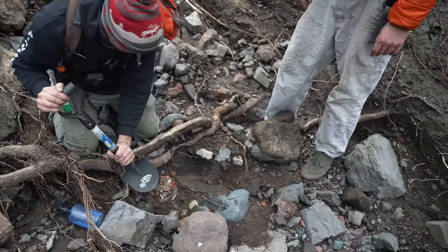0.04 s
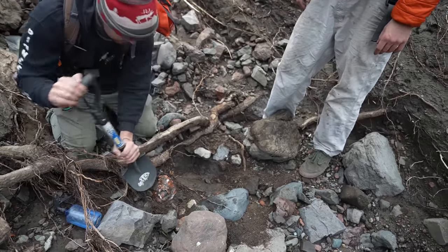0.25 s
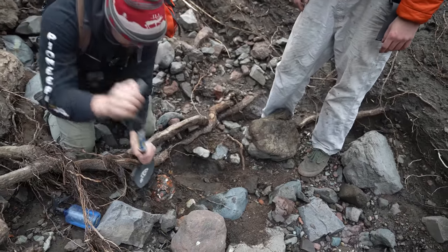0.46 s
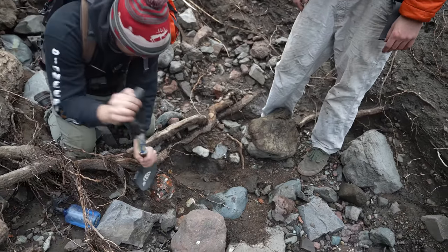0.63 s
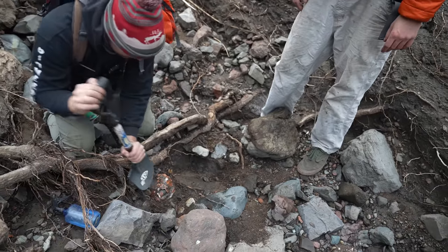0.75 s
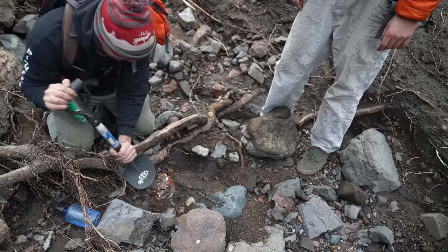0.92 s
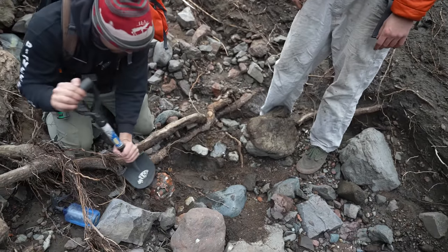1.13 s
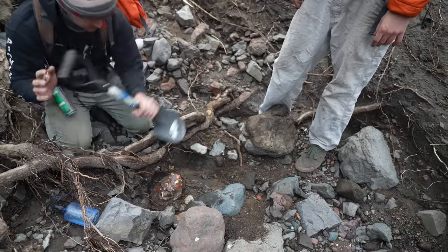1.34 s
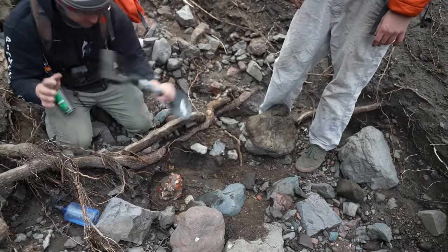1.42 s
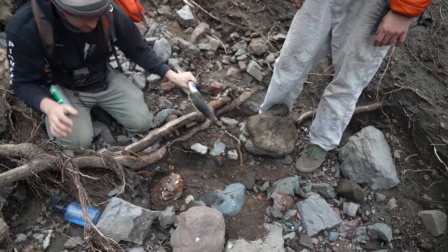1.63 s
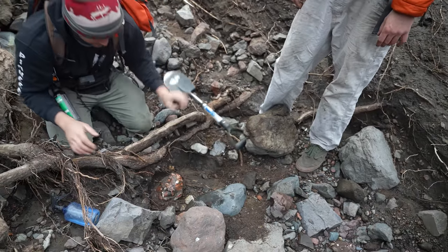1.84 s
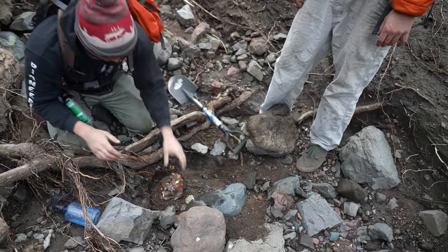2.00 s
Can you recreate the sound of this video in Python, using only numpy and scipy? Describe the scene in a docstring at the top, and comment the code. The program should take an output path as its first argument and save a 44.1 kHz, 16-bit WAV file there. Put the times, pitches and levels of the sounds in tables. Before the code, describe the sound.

A small steel shovel digs close by, thudding into soil and chattering on rock right at the start. It grates through gravel while loose stones clack and grit ticks on the blade, striking rock sharply again near 0.6 and 1 second. Around 1.3 seconds it lifts out with soft knocks and a faint ring. At 1.9 seconds it is dropped and clangs. Faint outdoor air lies underneath.

```python
"""Outdoors on stony ground, one microphone close to a small steel shovel, faint air behind it.
The blade thuds into soil, bangs and chatters on rock, then grates on through gravel while loose stones
clack and grit ticks on the steel. It strikes rock again near 0.6 s and 1 s. Lifted out at 1.3 s, it
rings faintly; at 1.9 s it is dropped and clangs."""
import sys
import numpy as np
from scipy import signal
from scipy.fft import rfft, irfft
from scipy.io import wavfile
from scipy.ndimage import uniform_filter1d

SR = 44100
rng = np.random.default_rng(int(sys.argv[2]) if len(sys.argv) > 2 else 0)


def dump(signal):
    """Clip the signal to [-1, 1] and save it as 16-bit WAV at the path in sys.argv[1]."""
    limited = np.clip(np.atleast_2d(signal).T, -1, 1)
    pcm = np.round(limited * 32767).astype(np.int16)
    wavfile.write(sys.argv[1], SR, pcm)


N = 91110


def undb(db):
    return 10 ** (np.asarray(db) / 20)


def unit(x, count=None):
    """Scale to rms 1, taken over the first count samples or over all."""
    return x / np.sqrt(np.mean(x[:count] ** 2))


def band(x, lo_hz, hi_hz):
    return signal.sosfilt(signal.butter(2, [lo_hz, hi_hz], "bandpass", fs=SR, output="sos"), x)


def colour(x, spectrum):
    """Shape a sound with (Hz, dB) points, rolling off beyond both ends; rms 1."""
    hz, db = np.array(spectrum, float).T
    f = np.arange(len(x) // 2 + 1) * SR / len(x) + 1
    rolloff_db = 2.7 * np.maximum(np.log2(hz[0] / f), 0) + 24 * np.maximum(np.log2(f / hz[-1]), 0)
    gain = undb(np.interp(np.log(f), np.log(hz), db) - rolloff_db)
    return unit(irfft(rfft(x) * gain, len(x)))


def ring(modes, count, db=0):
    """Sum decaying sines with random phases, one for each (Hz, dB, t60 s) mode."""
    t = np.arange(count) / SR
    hz, level_db, t60 = np.array(modes, float).T[:, :, None]
    phase = 2 * np.pi * rng.random((len(modes), 1))
    envelope = undb(level_db + db) * np.exp(-np.log(1000) * t / t60)
    return np.sum(envelope * np.sin(2 * np.pi * hz * t + phase), axis=0)


# open air around the microphone (frequency [Hz], relative density [dB])
AIR_SPECTRUM = [(30,-10.5), (120,-7), (340,-13.5), (1500,-27), (3250,-19.5), (11000,-31), (16000,-39)]


def outdoor_air(level_db=-55, waver_hz=9.95):
    """Faint background noise whose level wavers by about 1 dB."""
    noise = colour(rng.standard_normal(N), AIR_SPECTRUM)
    hold = int(SR / waver_hz)
    steps = np.repeat(rng.standard_normal(N // hold + 1), hold)
    waver_db = unit(uniform_filter1d(steps, hold)[:N])
    return noise * undb(level_db + waver_db)


# soil thuds, stone clacks and clinks of the carried shovel (time [s], pitch [Hz], level [dB], t60 [s])
KNOCKS = [(0.0, 144, 7.5, 0.011), (0.011, 183, 0, 0.028), (0.03, 134, -12, 0.081),
          (0.077, 108.7, -28.5, 0.39), (0.127, 105, -10, 0.031), (0.177, 1110, -27.5, 0.07),
          (0.361, 600, -21.5, 0.026), (0.368, 291, -21.5, 0.036), (0.393, 1234, -24, 0.026),
          (0.579, 335, -18, 0.035), (1.038, 290, -22.5, 0.069), (1.178, 685, -28, 0.1),
          (1.254, 163.5, -22.5, 0.11), (1.264, 194.4, -11.5, 0.047), (1.263, 68, -16.5, 0.061),
          (1.284, 1100, -24, 0.037), (1.297, 140, -16.5, 0.028), (1.645, 3150, -51.5, 0.068),
          (1.69, 3250, -50, 0.11), (1.733, 1690, -42.5, .07), (1.888, 181, -12, 0.016),
          (1.946, 2369, -32, 0.31), (1.981, 535, -10, 0.041), (2.042, 768, -22, 0.056)]


def knocks():
    """Each knock on soil, stone or steel is a soft push into one damped tone."""
    out, t = np.zeros(N), np.arange(SR // 5) / SR
    for at_s, hz, db, t60 in KNOCKS:
        push = np.minimum(2 * hz * t, 1)  # rises over half a cycle
        envelope = undb(db) * push * np.exp(-np.log(1000) * t / t60)
        add(out, at_s, envelope * np.sin(2 * np.pi * hz * t))
    return out


# course of the blade through gravel (time [s], rumble level [dB], grit level [dB])
GRATING_LEVELS = [(0,-36.5,-36.5), (0.129,-34,-36), (.2,-44,-45.5), (.33,-46,-50.5), (.42,-44,-46),
                  (.55,-52.5,-53.5), (.78,-48,-52), (0.842,-38,-44), (1.0,-39,-42), (1.121,-38,-43),
                  (1.188,-36,-41.5), (1.302,-37.5,-41.5), (1.322,-44,-51.5), (1.42,-53.5,-63.5),
                  (1.864,-54,-57.5), (1.92,-20,-42), (1.975,-42.5,-71), (2.0,-34.5,-46), (2.066,-36,-61)]
# shifting stones (frequency [Hz], relative density [dB])
RUMBLE_SPECTRUM = [(100,-11), (290,7.5), (700,-0.5), (1100,-1), (1800,-14.5)]
# fine grit (frequency [Hz], relative density [dB])
GRIT_SPECTRUM = [(1200,-4), (2400,-0.5), (6500,-6), (15500,-23.5)]


def gravel_grating(grains_per_s=2700, spread_db=0.5):
    """Dense uneven grains make a low rumble of shifting stones and a finer hiss of grit."""
    def grains():
        contacts = (rng.random(N) < grains_per_s / SR) * rng.standard_normal(N)
        return contacts * undb(spread_db * np.minimum(rng.exponential(size=N), 3.0))

    t = np.arange(N) / SR
    at_s, rumble_db, grit_db = np.array(GRATING_LEVELS).T
    rumble = colour(grains(), RUMBLE_SPECTRUM)
    grit = colour(grains() + rng.standard_normal(N), GRIT_SPECTRUM)
    return rumble * undb(np.interp(t, at_s, rumble_db)) + grit * undb(np.interp(t, at_s, grit_db))


# modes of the blade pressed into the ground (pitch [Hz])
DAMPED_HZ = [690, 910, 1075, 1245, 1500, 2210, 2380, 2830, 3550, 4130, 4430, 4780, 5340, 5430, 6250, 6530,
             6950, 7700, 8160, 10100, 10890]
# the same modes, row for row (relative level [dB], t60 [s])
DAMPED_MODES = [(-12, 0.062), (2, 0.059), (3, 0.032), (-1, 0.099), (12.5, 0.011), (-8.5, 0.091),
                (-8, 0.059), (-12.5, 0.097), (-2, 0.076), (6.5, 0.032), (-6.5, 0.11), (2.5, 0.031),
                (6, 0.035), (-2, 0.04), (8, 0.022), (-4.5, .05), (-1.5, 0.046), (5, 0.02), (-1, 0.022),
                (-0.5, 0.039), (0.5, 0.038)]
# edges of the bass, low, mid, high and top bands (frequency [Hz])
BAND_EDGES_HZ = [150, 750, 1700, 3300, 7000, 15000]
# steel on rock (time [s], rise [s], chatter decay [s], t60 scale [ratio], two pitches favoured by the
# strike point [Hz], five band levels from bass to top [dB])
STRIKES = [(0.0248,0.00094,0.025,0.7,6250,4130,-53,-19.5,-29,-15.5,-27),
           (0.0429,0.002,0.0094,0.22,3700,1240,-66,-28,-30.5,-19,-41),
           (0.0518,0.00039,0.0036,0.78,5430,2210,-48,-25.5,-41.5,-22.5,-40),
           (0.071,0.0036,0.013,0.49,10100,4130,-27,-23.5,-29,-35,-28),
           (0.077,0.002,0.008,1.34,5430,910,-35.5,-22,-44,-23,-57),
           (0.112,0.0059,0.013,1.3,3550,690,-38,-27,-40,-31.5,-44.5),
           (0.5757,0.00086,0.012,0.68,4430,1500,-35,-27.5,-26.5,-17,-24),
           (0.5831,0.00043,0.0031,1.2,5700,2210,-52,-33,-28.5,-24,-32),
           (0.5893,0.000089,0.0062,0.61,5300,910,-32,-28.5,-26.5,-16.5,-20.5),
           (0.975,0.0035,0.0043,1.07,4780,2380,-44,-40,-35,-35.5,-37.5),
           (1.004,0.0033,0.0045,0.98,1075,4790,-31.5,-13.5,-22,-16.5,-26.5),
           (1.034,0.0029,0.0042,0.98,6530,2210,-65,-21,-31.5,-23.5,-32.5),
           (1.0689,0.0033,0.0037,0.92,10890,6390,-62,-39.5,-30.5,-31,-18),
           (1.888,0.0029,0.016,1.4,690,2830,-36.5,-64,-38.5,-43,-42),
           (1.9053,0.0003,0.011,1.4,690,3550,-29.5,-49,-28.5,-34.5,-43),
           (1.9208,0.00035,0.021,0.78,2830,690,-25,-31,-19,-20.5,-39),
           (1.939,0.00043,0.012,1.02,690,2380,-21,-58,-27,-32.5,-46),
           (1.9811,0.0014,0.007,0.36,1075,6250,-17.5,-19.5,-19.5,-19.5,-19),
           (1.988,0.00068,0.036,0.48,3200,910,-20.5,-33,-18.5,-21,-58)]


def rock_strikes(scatter_db=5.5, minor_t60_s=0.055, tail_s=0.013, dull_hz=9350):
    """A short chatter of steel on stone cracks, rings the damped blade and scatters off the ground."""
    out, count = np.zeros(N), SR // 8
    t = np.arange(count) / SR
    onset = 660  # samples: the first 15 ms set each level
    modes = np.column_stack([DAMPED_HZ, DAMPED_MODES])
    # many small modes lie between the strong ones
    minor_hz = np.geomspace(500, 14000, num=60) * (1 + .03 * rng.standard_normal(60))
    for at_s, rise_s, chatter_s, t60_scale, first_hz, second_hz, *band_db in STRIKES:
        crack_noise, tail_noise = rng.standard_normal((2, count))
        rise = 1 - np.exp(-(t / rise_s) ** 2)
        favoured_hz = [first_hz, second_hz]
        body_db = scatter_db * rng.standard_normal(len(modes))
        body_db += strike_point_db(modes[:, 0], favoured_hz, width=.015)
        body = rise * ring(modes * [1, 1, t60_scale], count, body_db[:, None])
        minor_modes = [(hz, 0, minor_t60_s * t60_scale + chatter_s) for hz in minor_hz]
        minor_db = 1.5 * rng.standard_normal(len(minor_hz))
        minor_db += strike_point_db(minor_hz, favoured_hz, width=.07)
        minor = rise * ring(minor_modes, count, minor_db[:, None])
        crack = crack_noise * rise * np.exp(-t / chatter_s)
        tail = tail_noise * rise * np.exp(-t / tail_s)
        steel = unit(body, onset) + undb(-7) * unit(minor, onset) + undb(-6) * unit(crack, onset)
        blow = band(steel + undb(-27) * tail, 300, dull_hz)
        for k, db in enumerate(band_db):
            part = unit(band(blow, *BAND_EDGES_HZ[k:k + 2]), onset)
            add(out, at_s, (-1) ** k * undb(db) * part)  # neighbouring bands alternate in polarity
    return out


def strike_point_db(hz, favoured_hz, width, boost_db=9):
    """Modes near those the strike point drives best come out louder; width is a share of the pitch."""
    distance = np.log(hz[:, None] / favoured_hz) / width
    return boost_db * np.max(np.exp(-distance ** 2), axis=1)


# small grit landing on the blade (time [s], band centre [Hz], level [dB])
GRIT_TICKS = [(0.48,6400,-51.5), (0.749,4730,-47), (0.843,5330,-48), (1.145,2490,-43), (1.188,2830,-39),
              (1.344,4050,-46.5), (1.56,860,-46), (1.753,5770,-55), (1.862,5570,-56)]


def grit_ticks(decay_s=0.0062):
    """Grit ticks on the steel in brief noise bursts two octaves wide."""
    out, t = np.zeros(N), np.arange(SR // 20) / SR
    for at_s, hz, db in GRIT_TICKS:
        burst = rng.standard_normal(len(t)) * np.exp(-t / decay_s)
        add(out, at_s, undb(db) * unit(band(burst, hz / 2, hz * 2), count=440))
    return out


# modes of the blade clear of the soil (pitch [Hz])
FREE_HZ = [1766, 2078, 2369, 2681, 2993, 3176, 3435, 4344, 4667, 5700, 7090, 8592, 10760]
# the same modes, row for row (relative level [dB], t60 [s])
FREE_MODES = [(-2, .55), (-5, .6), (-12, .4), (0, .13), (-4, .12), (-2, .3), (-7, .35), (-9, .07), (-3, .8),
              (-13, .15), (-16, .15), (-4, .09), (-12, .09)]
# the lift, then the drop (time [s], gain [dB], tilt above the lowest mode [dB/octave], rise [s])
FREE_RINGS = [(1.306, -35.5, -56, 0.064), (1.987, -23, 1.9, 0.0059)]


def free_blade_rings():
    """No longer damped by soil, the blade sings on its long modes."""
    out, modes = np.zeros(N), np.column_stack([FREE_HZ, FREE_MODES])
    octaves = np.log2(modes[:, :1] / modes[0, 0])
    for at_s, db, tilt_db, rise_s in FREE_RINGS:
        tone = ring(modes, SR // 2, db + tilt_db * octaves)
        rise = np.minimum(np.arange(len(tone)) / (rise_s * SR), 1)
        add(out, at_s, tone * rise)
    return out


def add(out, at_s, x):
    start = int(at_s * SR)
    out[start:start + len(x)] += x[:N - start]


def scene():
    """Air, ground and shovel meet at the one microphone."""
    ground = outdoor_air() + knocks() + gravel_grating()
    shovel = rock_strikes() + grit_ticks() + free_blade_rings()
    return (ground + shovel)[None]


def record(dry):
    """The recorder rounds the loudest peaks and cuts the top."""
    ceiling, top_hz = 1.1, 15700
    rounded = ceiling * np.tanh(dry / ceiling)
    return signal.sosfilt(signal.ellip(8, .2, 70, top_hz, fs=SR, output="sos"), rounded)


dry = scene()
out = record(dry)
dump(out)
```